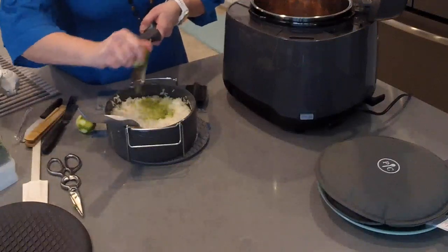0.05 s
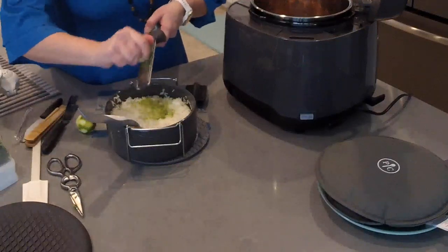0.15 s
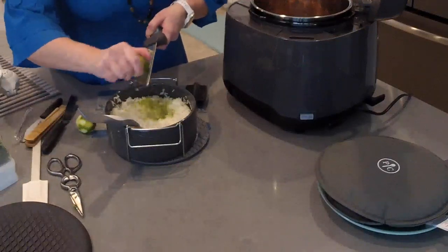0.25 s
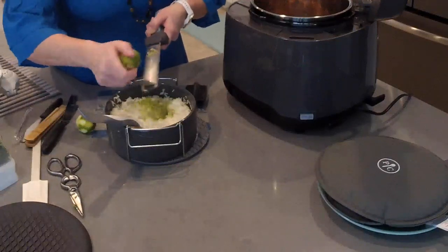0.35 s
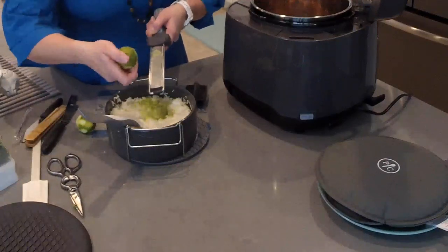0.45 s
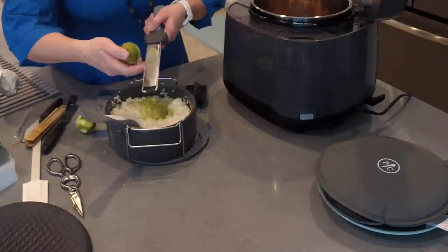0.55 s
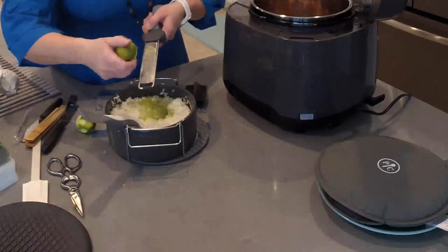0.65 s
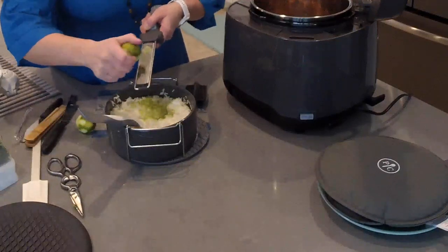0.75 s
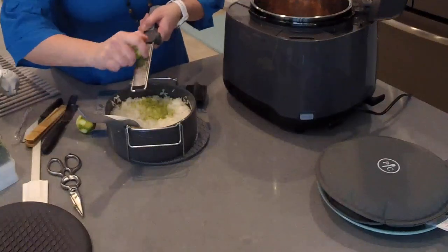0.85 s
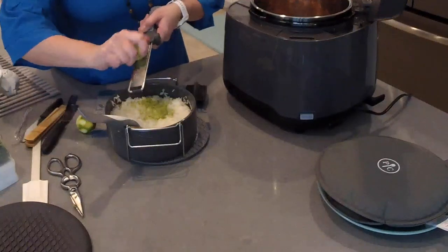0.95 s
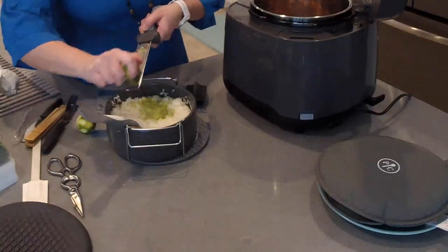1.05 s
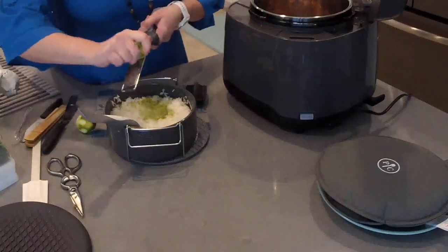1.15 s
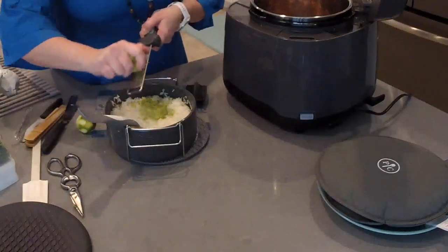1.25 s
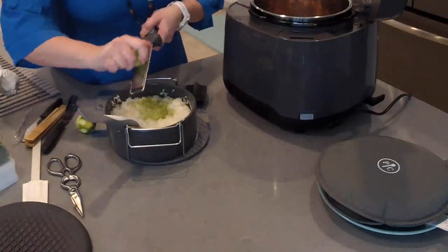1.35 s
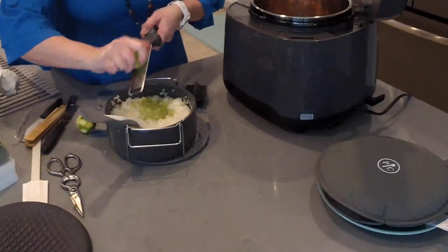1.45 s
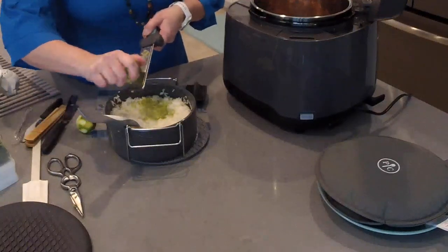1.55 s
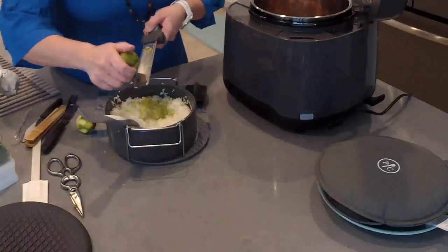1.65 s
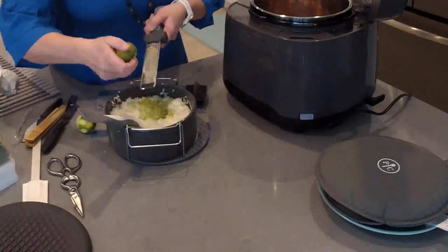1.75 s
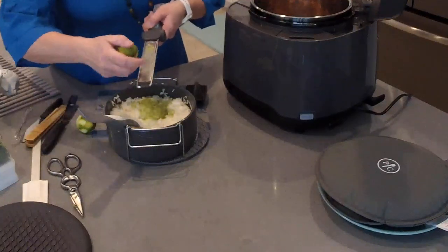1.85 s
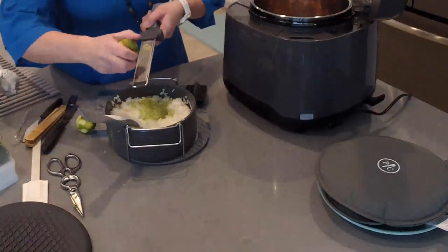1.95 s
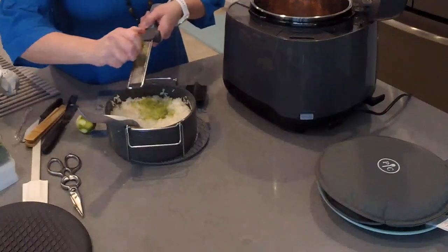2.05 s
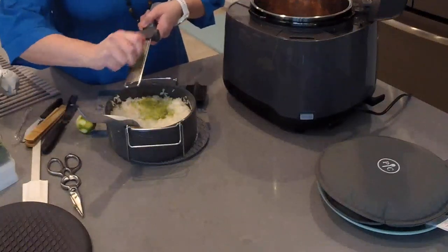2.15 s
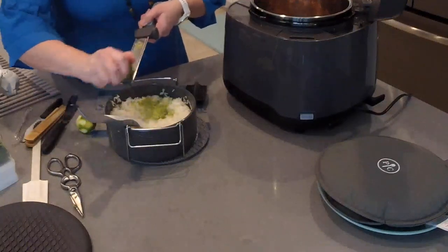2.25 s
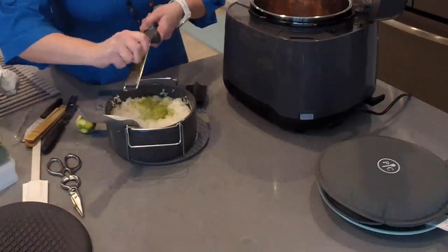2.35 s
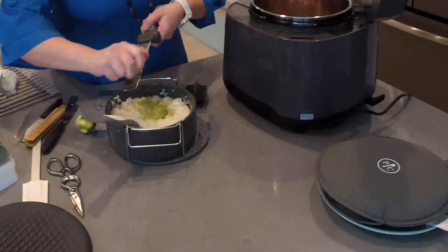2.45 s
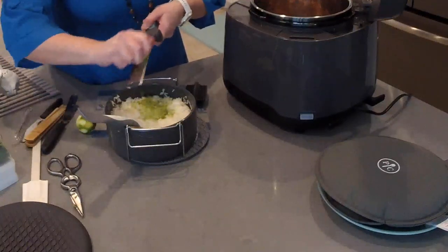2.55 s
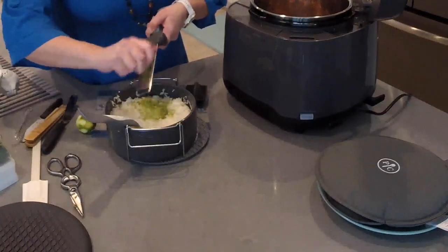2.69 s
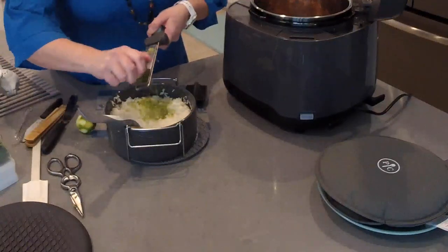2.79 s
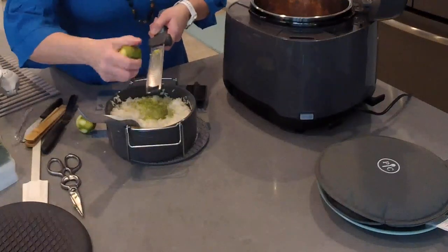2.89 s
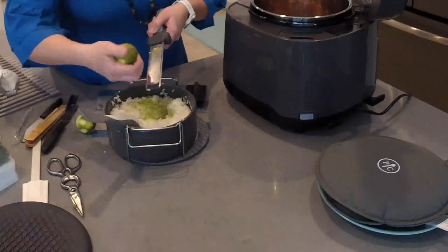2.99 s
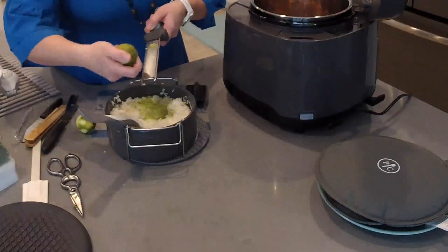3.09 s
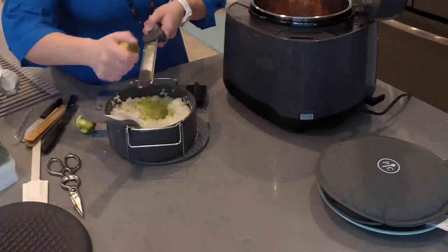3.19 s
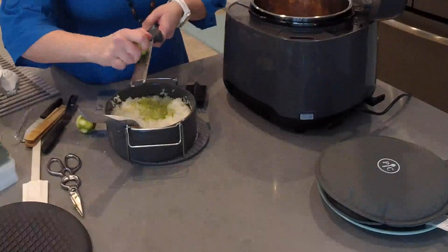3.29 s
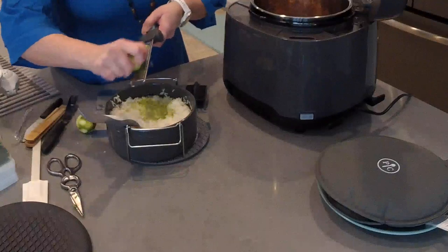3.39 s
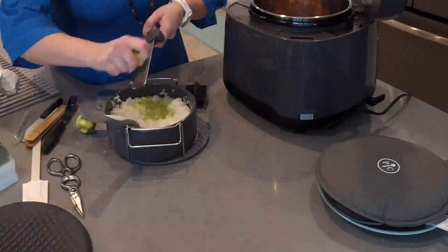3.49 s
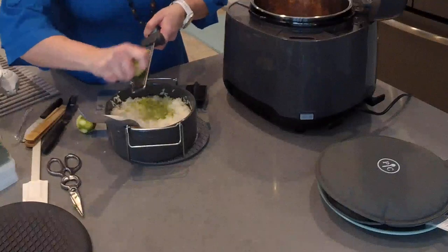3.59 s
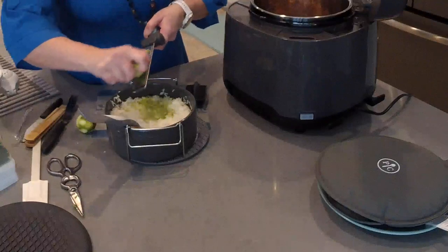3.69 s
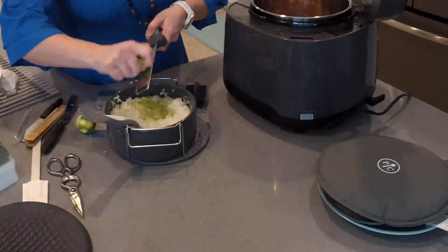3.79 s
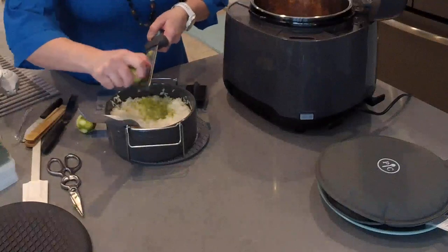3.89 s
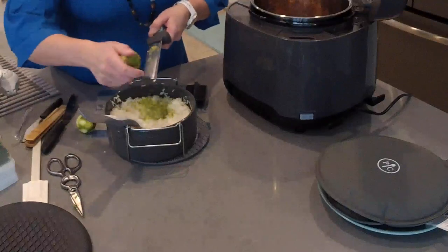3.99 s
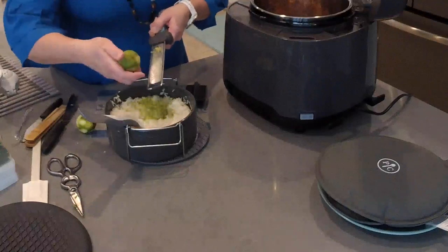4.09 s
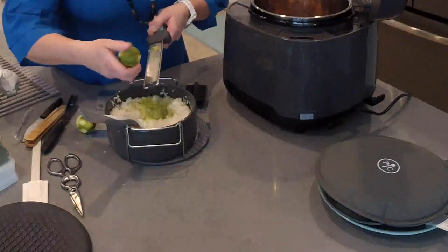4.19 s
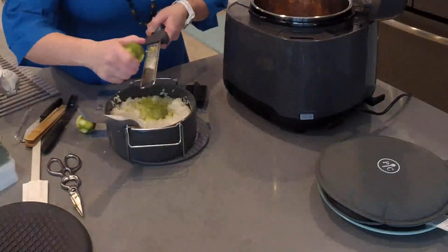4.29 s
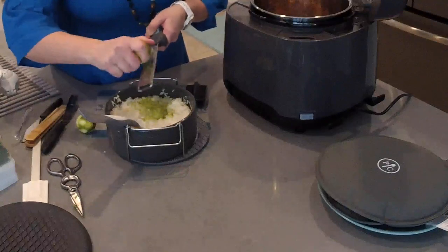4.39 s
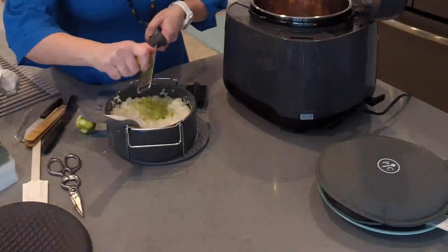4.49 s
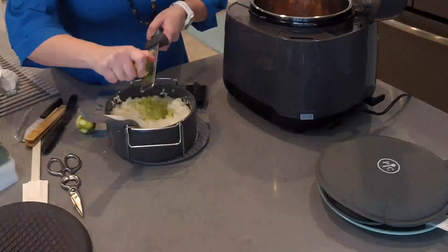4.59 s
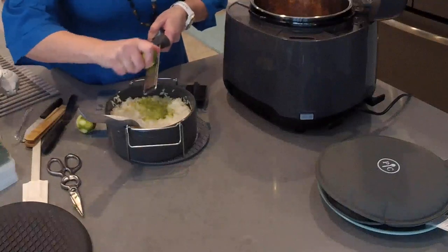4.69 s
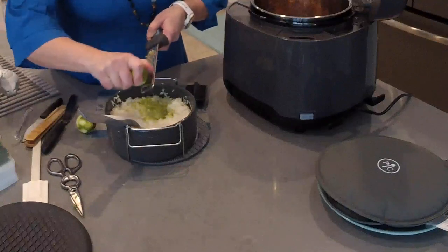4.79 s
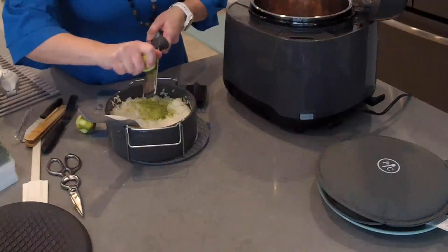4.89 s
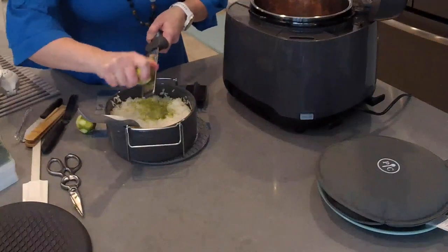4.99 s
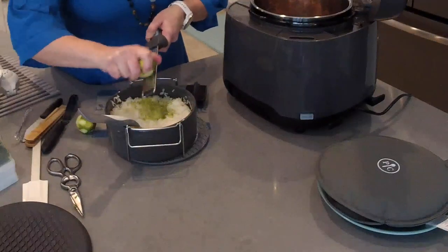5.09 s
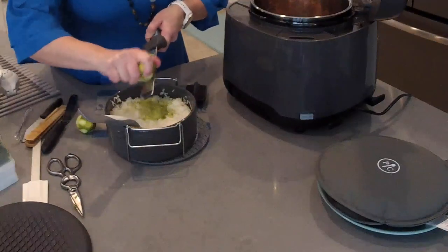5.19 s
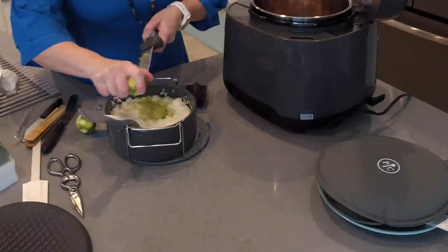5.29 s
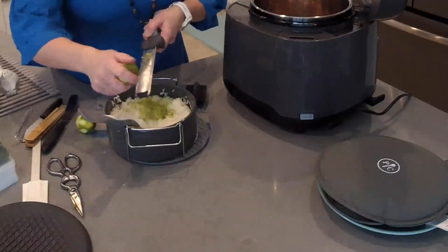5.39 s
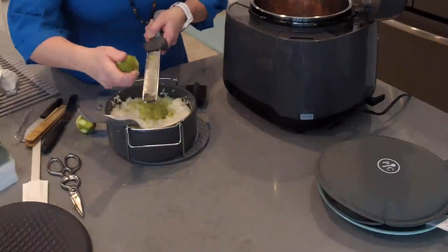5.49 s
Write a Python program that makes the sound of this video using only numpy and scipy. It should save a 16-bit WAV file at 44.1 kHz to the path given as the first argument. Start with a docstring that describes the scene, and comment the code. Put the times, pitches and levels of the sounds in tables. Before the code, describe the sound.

A lime is zested on a hand-held steel rasp, close to a stereo microphone in a small kitchen. Each push lasts about a tenth of a second: a bright, gritty scratch of tearing rind, with a duller rub underneath and a slight ring from the blade. A single stroke comes at 0.1 seconds, then a very faint metallic tick at about 0.7. Bouts of three quick strokes follow from 0.9 to 1.5, from 2.1 to 2.7, and from 3.3 to 3.8 seconds, with light drags back between pushes. The fruit softly grazes the blade at 4 seconds. A last bout of four strokes runs from 4.4 to about 5.3 seconds. The scraping has short, slight room reflections. Throughout, and alone in the pauses, there is a steady low appliance hum, a soft room rumble and a faint hiss.

```python
"""A lime zested on a hand-held steel rasp over a pot, close to a stereo microphone in a small kitchen.
Five bouts of quick, hard pushes, with a light drag back between strokes; the fruit is turned in the pauses.
The teeth tear the rind in thousands of tiny snaps, the fruit rubs dully and the blade rings.
Further back, appliances hum and the room rumbles; the microphone adds a faint hiss."""
import sys
import numpy as np
from scipy import signal
from scipy.fft import rfft, irfft, next_fast_len
from scipy.io import wavfile

SR = 44100
rng = np.random.default_rng(int(sys.argv[2]) if len(sys.argv) > 2 else 0)


def master(y):
    """Save y as 16-bit WAV."""
    cut = np.clip(np.atleast_2d(y).T, -1, 1)
    pcm = np.round(cut * 32767)  # scale
    wavfile.write(sys.argv[1], SR, pcm.astype(np.int16))


N = 244314


def rasp(snap_db, rub_db, blade_db, judder_db):
    """Teeth tear the rind; the grip judders as rows of teeth catch and let go."""
    # bright snap of the rind at the teeth: frequency_hz, relative_db
    snap_spectrum = [(2500, -23), (5000, -21), (6600, -8), (7300, -12), (8100, 4.5), (9200, 3.5),
                     (10600, 1.5), (11300, -8), (12400, -13.5), (13400, -13), (15400, -25)]
    # duller rub through the fruit and the blade: frequency_hz, relative_db
    rub_spectrum = [(250, -18.5), (650, 8), (1000, 1.5), (1500, 1), (2000, -4.5), (2800, -6.5), (3500, 0),
                    (4300, -5.5), (6000, 0.5), (9000, -15)]
    bite = hand_pressure()
    catch = snags(decay_s=0.0065, gain_db=-3.5)
    tearing = rms_one(snaps(per_s=8000, spread_db=-1.5) * from_db(judder_db * drift(84)))
    teeth = tearing * (bite + catch)
    bright = from_db(snap_db) * colour(teeth, snap_spectrum)
    rubbing = snaps(per_s=7000, spread_db=4.0) * from_db(drift(110))
    brush = stroke(start_s=4.0, length_s=0.13, level_db=-67)  # the turning fruit grazes the blade, uncut
    dull = from_db(rub_db) * colour(rubbing * (bite + brush), rub_spectrum)
    steel = from_db(blade_db) * blade(teeth, shift_db=5.0)
    # only the shortest waves are shaded on the far side
    return panned(bright, pan_db=2.5) + dull + steel


def hand_pressure():
    """Pressure of the rind on the teeth: hard pushes, with a light drag back between those of a bout."""
    # pushes of the lime down the rasp: start_s, length_s, level_db
    pushes = [(0.096, 0.12, -59), (0.903, 0.12, -60), (1.166, 0.1, -61.5), (1.386, 0.13, -57),
              (2.094, 0.12, -61.5), (2.348, 0.11, -58.5), (2.595, 0.13, -56.5), (3.288, 0.12, -58),
              (3.518, 0.099, -56), (3.741, 0.098, -56), (4.419, 0.043, -65.5), (4.456, 0.08, -62),
              (4.662, 0.099, -58), (4.892, 0.11, -58.5), (5.126, 0.12, -58)]
    hop_s, pause_s = 0.05, 0.3  # only gaps between these lengths hold a drag
    turn_s = 0.0069  # the hand changes direction
    pressure, last_end = np.zeros(N), 0
    for start, length, level_db in pushes:
        pressure += stroke(start, length, level_db)
        if hop_s < start - last_end < pause_s:
            pressure += drag(last_end + turn_s, start - turn_s)
        last_end = start + length
    return pressure


def stroke(start_s, length_s, level_db):
    """One pass over the blade: press in, slide while the pressure sags, lift off."""
    pressed, lifting, sag_db = 0.33, 0.75, -1.5
    corners_s = start_s + length_s * np.array([0, pressed, lifting, 1])
    return np.interp(np.arange(N) / SR, corners_s, [0, from_db(level_db), from_db(level_db + sag_db), 0])


def drag(start_s, end_s):
    """The light return swells and fades with the speed of the hand, lighter as the work goes on."""
    level_db, db_per_s = -67, -1
    along = np.clip((np.arange(N) / SR - start_s) / (end_s - start_s), 0, 1)
    return from_db(level_db + db_per_s * start_s) * np.sin(np.pi * along)


def snags(decay_s, gain_db):
    """A tooth holds, then rips free in a burst a few milliseconds long."""
    # single teeth catching on the rind: start_s, relative_db
    catches = [(0.138, -50.5), (1.1593, -54), (1.185, -58), (1.4274, -51), (2.1874, -66), (2.619, -52),
               (3.316, -58), (3.531, -54), (3.7459, -60), (4.45, -53), (4.6828, -51), (4.91, -62)]
    t, force = np.arange(N) / SR, np.zeros(N)
    for start, db in catches:
        force += from_db(db + gain_db) * (t >= start) * np.exp(-np.abs(t - start) / decay_s)
    return force


def snaps(per_s, spread_db):
    """Random clicks of uneven size and sign, at unit rms."""
    sizes = from_db(spread_db * np.minimum(rng.exponential(1, N), 4))
    signs = rng.choice([-1, 1], N)
    return rms_one(sizes * signs * (rng.random(N) < per_s / SR))


def blade(teeth, shift_db):
    """The steel rings; which modes speak most changes as the lime travels along it."""
    # modes of the steel blade: pitch_hz, relative_db, t60_s
    modes = [(1346, -11.5, 0.034), (1935, -6.5, 0.015), (6640, -4.5, 0.015), (8170, -4, 0.019),
             (9640, -1.5, 0.028), (10200, -16, 0.011)]
    return sum(from_db(db + shift_db * drift(11.0)) * ring(teeth, hz, t60) / np.sqrt(t60 * SR)
               for hz, db, t60 in modes)


def handling_tap(t60_s, gain_db):
    """A light contact gives a brief ping as the lime and the rasp are handled."""
    # the contact: start_s, relative_db, pitch_hz
    contacts = [(0.7322, -77, 5640)]
    return sum(from_db(db + gain_db) * ring(signal.unit_impulse(N, round(start * SR)), hz, t60_s)
               for start, db, hz in contacts)


def kitchen(direct, early_db, early_t60_s):
    """Quick reflections off worktop and pots change as the hands move; the room's tail follows."""
    place = np.pi / 2 * drift(1.31)
    early = sum(reflections(direct * share, early_db, early_t60_s, delay_s=0.00068)
                for share in (np.cos(place), np.sin(place)))
    return direct + early + reflections(direct, level_db=-10.5, t60_s=0.52, delay_s=0.051)


def reflections(x, level_db, t60_s, delay_s):
    """A dense, dying train of echoes reaches the microphone from all round."""
    t = np.arange(SR // 2) / SR
    decay = np.exp(-np.log(1000) * t / t60_s) * (t > delay_s)
    response = rms_one(diffuse(len(t)) * decay) / np.sqrt(len(t))
    return from_db(level_db) * signal.fftconvolve(x, response, axes=1)[:, :N]


def appliances(waver_db, wander_rad):
    """Motor and mains tones waver a little in the background, with noise ringing in the cabinets."""
    # appliance motors and mains hum: pitch_hz, level_db
    hum_tones = [(49.3, -57.5), (58.5, -67), (120, -64), (147.5, -77.5), (240, -70.5), (253.5, -75),
                 (259.5, -72), (360, -82.5), (383.4, -71.5), (480, -91), (1681, -95)]
    # fan and cabinet resonances: pitch_hz, width_hz, level_db
    resonances = [(89.2, 8.1, -65.5), (249.4, 13, -68.5), (285, 19, -85)]
    # where the hum lies, mostly a little to the left: frequency_hz, left_minus_right_db
    hum_pan = [(50, 1), (120, -0.3), (250, 2)]
    t, out = np.arange(N) / SR, np.zeros((2, N))
    for hz, db in hum_tones:
        phase = 2 * np.pi * (hz * t + rng.random()) + wander_rad * drift(0.46)
        tone = from_db(db + waver_db * drift(0.93)) * np.sqrt(2) * np.sin(phase)
        out += panned(tone, at_hz(hum_pan, hz))
    for hz, width, db in resonances:
        boom = rms_one(ring(rng.standard_normal(N), hz, t60_s=np.log(1000) / (np.pi * width)))
        out += panned(from_db(db) * boom, at_hz(hum_pan, hz))
    return out


def room_tone():
    """Steady rumble of the room, and a faint hiss that is separate in each channel."""
    # air noise of the room: frequency_hz, density_db_per_hz
    air_spectrum = [(20, -71), (45, -79), (70, -86.5), (110, -86.5), (160, -85.5), (200, -88), (280, -95.5),
                    (430, -94.5), (520, -99), (1000, -105), (1600, -112), (2100, -120), (3200, -130),
                    (8000, -145)]
    # the microphone's own hiss: frequency_hz, density_db_per_hz
    hiss_spectrum = [(2000, -124), (3300, -121), (6300, -122), (7600, -119), (9400, -111.5), (10900, -116),
                     (12500, -124), (15400, -124)]
    size = next_fast_len(N, True)
    rumble = shaped(diffuse(size), air_spectrum)
    hiss = shaped(rng.standard_normal((2, size)), hiss_spectrum)
    return panned(rumble, pan_db=2.0) + hiss


def diffuse(size):
    """Noise arriving from all round: alike in both channels, except in the high treble."""
    # diffuse sound at the microphone: frequency_hz, left_right_correlation
    likeness = [(40, .9), (150, 0.97), (300, 0.96), (700, 0.85), (2000, 1), (4500, 1), (7000, 0.18),
                (10000, 0.0093)]
    mid, side = rfft(rng.standard_normal((2, size)))
    alike = np.clip(at_hz(likeness, np.fft.rfftfreq(size, 1 / SR)), 0, 1)
    return irfft(np.sqrt((1 + alike) / 2) * mid + np.sqrt((1 - alike) / 2) * side * [[1], [-1]], size)


def shaped(white, spectrum):
    """Give white noise a spectrum in dB per Hz."""
    size = white.shape[1]
    gain = from_db(at_hz(spectrum, np.fft.rfftfreq(size, 1 / SR))) * np.sqrt(SR / 2)
    return irfft(rfft(white) * gain, size)[:, :N]


def colour(x, spectrum, size=1024):
    """Causal (minimum-phase) filter of unit energy with the given spectrum."""
    gain = from_db(at_hz(spectrum, np.fft.rfftfreq(size, 1 / SR)))
    cepstrum = irfft(np.log(gain))
    cepstrum[1:size // 2] *= 2
    cepstrum[size // 2 + 1:] = 0
    response = irfft(np.exp(rfft(cepstrum)))
    return signal.oaconvolve(x, response / np.linalg.norm(response))[:N]


def ring(x, hz, t60_s):
    """One mode: a unit click sets a sine of height 1 ringing."""
    r, w = np.exp(-np.log(1000) / (t60_s * SR)), 2 * np.pi * hz / SR
    return signal.lfilter([0, np.sin(w)], [1, -2 * r * np.cos(w), r * r], x + 1e-18)


def drift(rate_hz):
    """Smooth random wander of unit rms, mostly slower than the given rate."""
    step, settle = 40, 2000  # samples per point, points of run-in
    r = np.exp(-2 * np.pi * step * rate_hz / SR)
    white = rng.standard_normal(N // step + settle + 2)
    slow = signal.lfilter([1], [1, -2 * r, r * r], white)[settle:]
    return np.interp(np.arange(N) / step, np.arange(len(slow)), rms_one(slow))


def panned(x, pan_db):
    """Place a sound to the left (positive) or right."""
    return x * from_db([[pan_db / 2], [-pan_db / 2]])


def at_hz(points, hz):
    """Read a table on a log-frequency axis."""
    frequencies, values = np.transpose(points)
    return np.interp(np.log(np.maximum(hz, 1)), np.log(frequencies), values)


def from_db(db):
    """Decibels to gain."""
    return 10 ** (np.asarray(db) / 20)


def rms_one(x):
    """Scale to unit rms."""
    return x / np.sqrt(np.mean(x ** 2) + 1e-20)


def scene():
    """The zesting up close in the kitchen, with hum and room tone behind."""
    zesting = rasp(snap_db=1.5, rub_db=-8.0, blade_db=-0.5, judder_db=1.14)
    tap = handling_tap(t60_s=0.031, gain_db=5)
    foreground = kitchen(zesting + tap, early_db=-8.0, early_t60_s=0.11)
    return foreground + appliances(waver_db=1.0, wander_rad=0.38) + room_tone()


def record(dry):
    """The microphone has narrow dips, a steep top cut and a small steady offset."""
    # dips in the microphone's response: centre_hz, width_hz
    mic_dips = [(2430, 290), (4790, 454), (7180, 260), (11960, 520), (14380, 500)]
    # steady offset, left then right: offset_full_scale
    dc_offset = [
        [-.008],
        [-.0165],
    ]
    cutoff_hz = 15550
    for hz, width in mic_dips:
        b, a = signal.iirnotch(hz, hz / width, fs=SR)
        dry = signal.lfilter(b, a, signal.lfilter(b, a, dry))
    low_pass = signal.ellip(12, 0.1, 80, cutoff_hz, fs=SR, output="sos")
    return signal.sosfilt(low_pass, dry) + dc_offset


dry = scene()
out = record(dry)
master(out)
```